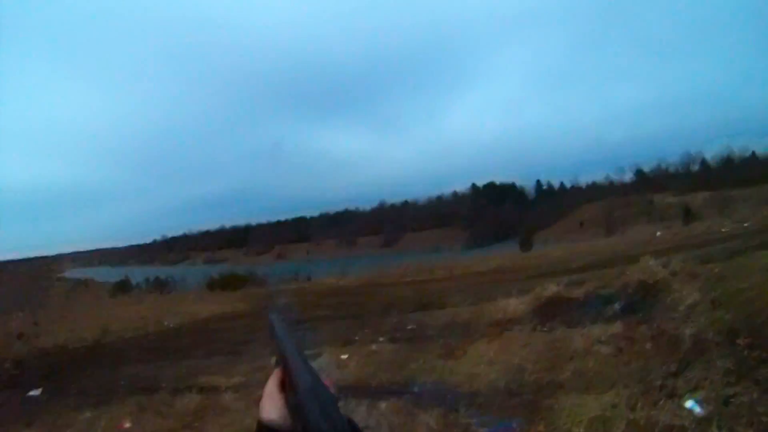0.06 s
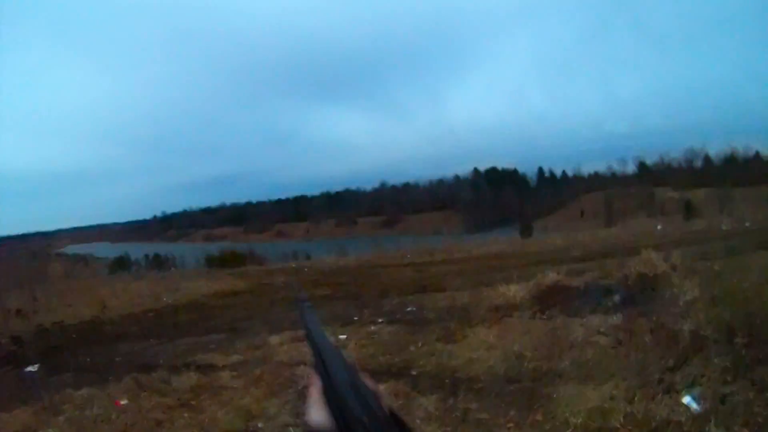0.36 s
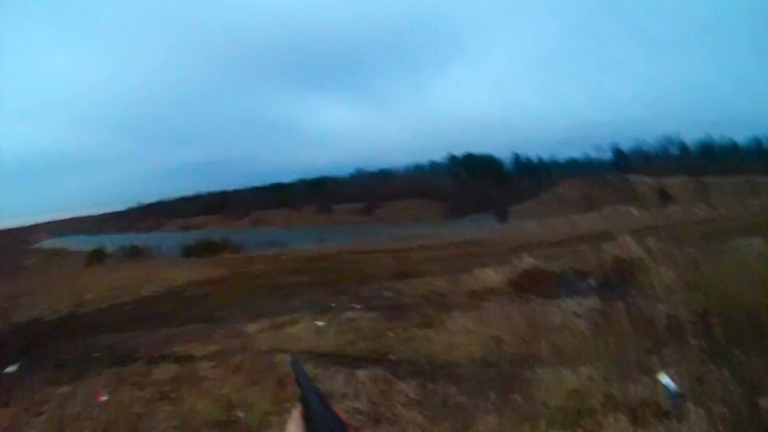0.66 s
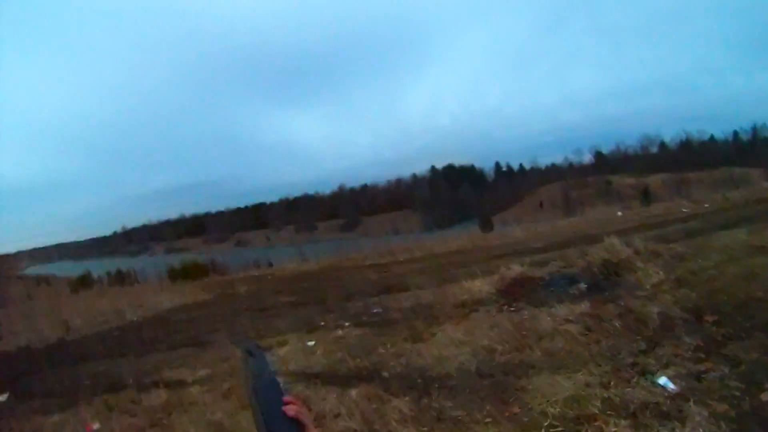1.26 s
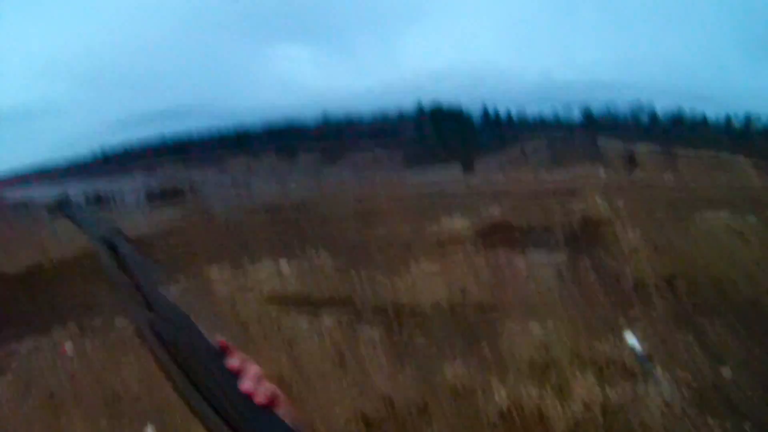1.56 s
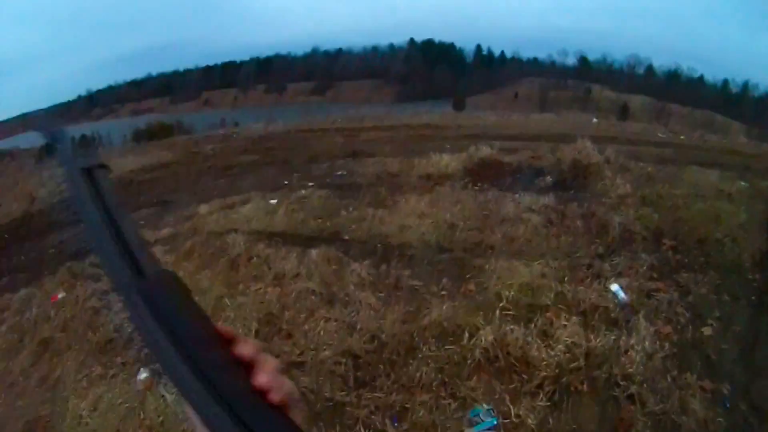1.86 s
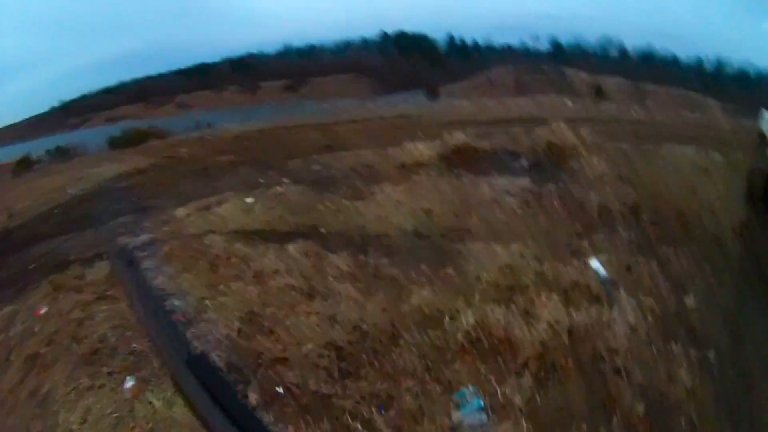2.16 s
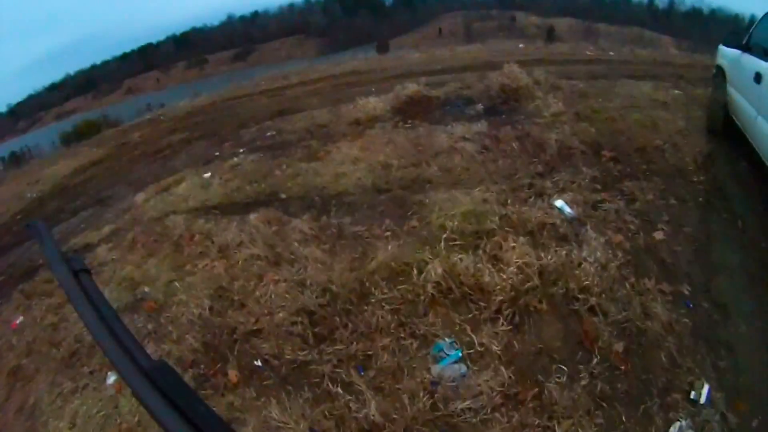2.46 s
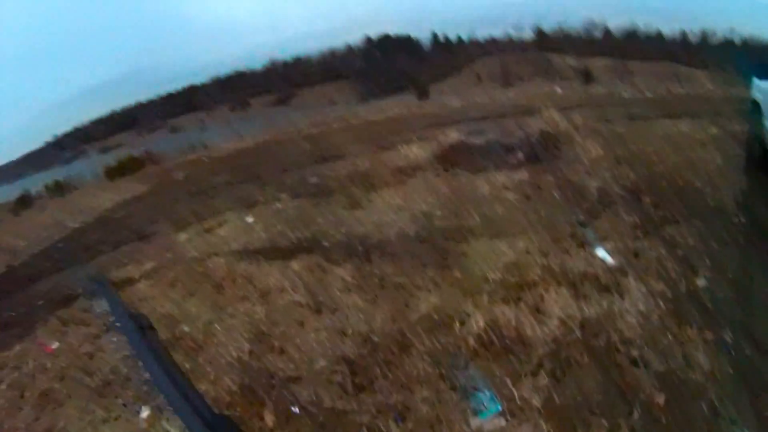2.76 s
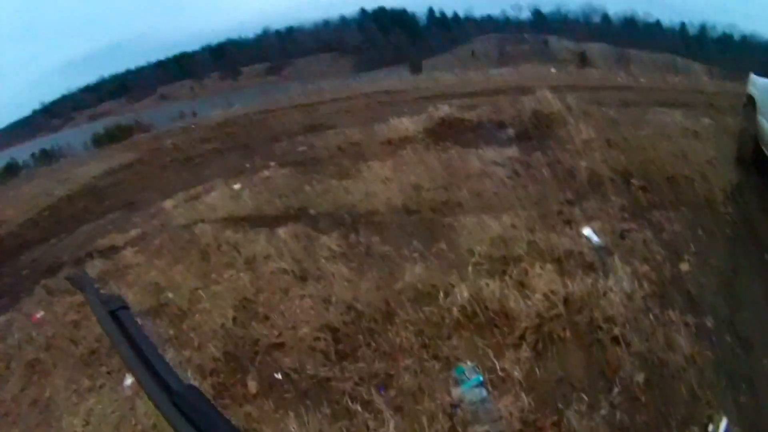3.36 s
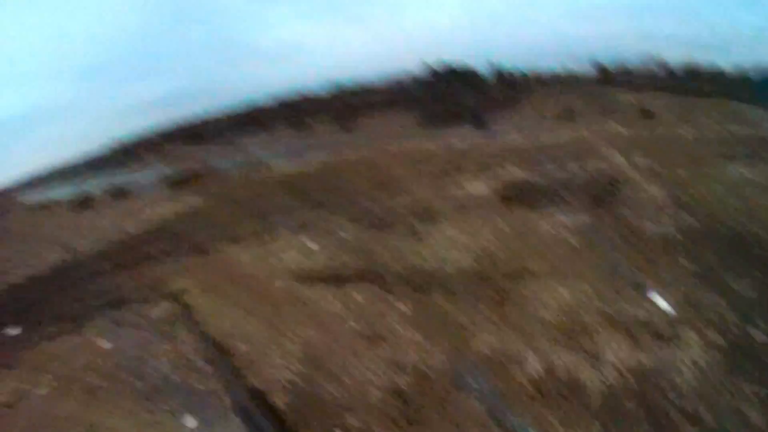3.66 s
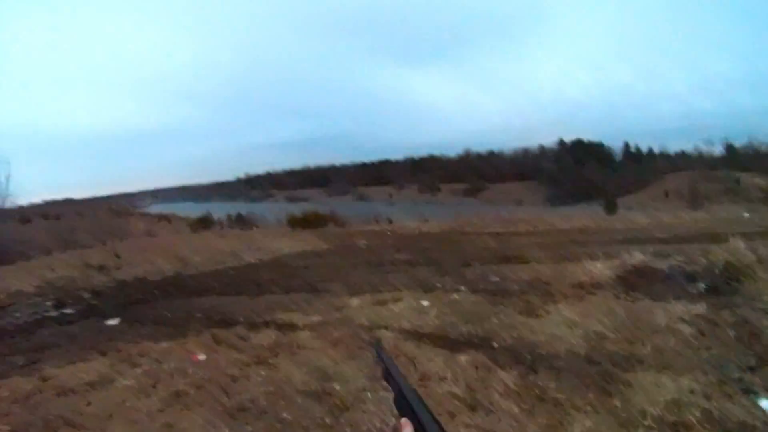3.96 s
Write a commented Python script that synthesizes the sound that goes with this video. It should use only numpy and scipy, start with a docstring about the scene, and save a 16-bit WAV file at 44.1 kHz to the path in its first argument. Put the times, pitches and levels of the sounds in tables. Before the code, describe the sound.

Close steel clicks and clacks of a shotgun being worked, over a dying gunshot echo outdoors.

```python
"""An open field: a shotgun is worked right beside a body-worn microphone. Steel parts slide, latch and
clack, ringing the receiver and barrel, and the stock knocks with them. The echo of a shot fired just
before rolls back from nearby banks and a far wooded slope, duller as it dies. Under it lie quiet field
air, a faint regular ticking and a trace of electrical whine. The gain ducks after the loudest clacks."""
import sys
import numpy as np
from scipy import signal
from scipy.fft import rfft, irfft, next_fast_len
from scipy.io import wavfile
from scipy.ndimage import uniform_filter1d

SR = 44100
rng = np.random.default_rng(int(sys.argv[2]) if len(sys.argv) > 2 else 0)


def file_out(sig):
    """Save sig as 16-bit WAV at sys.argv[1]."""
    # one column per channel
    cols = np.atleast_2d(sig).T
    # limit, then scale
    lim = np.clip(cols, -1, 1)
    pcm = np.round(lim * 32767).astype(np.int16)
    wavfile.write(sys.argv[1], SR, pcm)


N = 176400
HIT_TIME_S = np.arange(N // 16) / SR

# Steel contact: freq_hz, density_db
STEEL_SPECTRUM = [(1000, -25), (1600, -17), (2200, -4), (3000, -7), (3700, 1), (4800, -4), (6500, -2),
                  (8700, -14.5), (10300, -10), (11500, -13.5), (13500, -19.5), (16000, -32.5)]
# Stock knock: freq_hz, density_db
STOCK_SPECTRUM = [(40, -36.5), (150, -21.5), (330, -7), (520, -4.5), (650, 0), (780, -4), (1000, -5),
                  (1400, -12), (2500, -34), (6000, -58.5)]
# Receiver and barrel: pitch_hz, level_db, t60_s
STEEL_MODES = [(861.5, -23, 0.14), (2150, -6.5, 0.036), (2280, -1.5, .028), (2470, -6, 0.018),
               (2630, -3, .024), (3480, -2, 0.036), (3680, -0.5, 0.028), (4021, -4.5, 0.029),
               (4290, -5, 0.012), (4550, 0, 0.023), (4823, -0.5, 0.032), (5100, -4.5, 0.045),
               (6260, -4, 0.029), (6350, -5, .022), (10300, -7, 0.0069)]
# Strikes: start_s, steel_db, stock_db, contact_t60_s, tilt_db_per_octave
CLACKS = [(0.0045, -2, -15, 0.012, 2), (0.0118, -15.5, -29, 0.016, -1), (0.0165, -18.5, -32.5, 0.035, -1.5),
          (0.1157, -34, -40, 0.036, -5), (0.1256, -31.5, -46, 0.03, -7), (0.1318, -19.5, -31, 0.012, 1),
          (0.1401, -33, -25.5, 0.037, -2.5), (0.1446, -29, -40, 0.021, -9.5),
          (0.4262, -19.5, -34.5, 0.012, -3), (0.4433, -6, -24, 0.015, -0.5), (0.574, -46, -60, 0.024, 3),
          (0.6314, -33.5, -44.5, 0.036, -5.5), (0.6444, -29.5, -39, 0.023, -5.5),
          (0.6506, -18.5, -32.5, 0.024, -2), (0.6591, -28.5, -22, 0.019, -5), (0.6616, -30, -58, 0.03, -2),
          (0.679, -30.5, -40, 0.017, -6), (2.0048, -32, -34.5, 0.039, -6.5), (2.305, -45, -69, 0.016, -6.5),
          (2.971, -10, -25.5, 0.0045, -1), (2.98, -12.5, -32, 0.015, 0.5), (3.7075, -27, -47.5, .012, 3),
          (3.7152, -28.5, -34, 0.022, -1.5), (3.721, -30, -34, 0.034, 4), (3.7325, -19.5, -27, 0.019, 2.5),
          (3.7405, -26.5, -29, 0.0092, 0.5), (3.7523, -10, -23, 0.018, -3),
          (3.7618, -15.5, -22.5, 0.0141, 3.5), (3.7686, -6, -25, 0.021, -1.5), (3.7743, 0, -25.5, 0.011, 4),
          (3.7765, -2, -23, .011, -3), (3.7805, -20.5, -29, 0.0084, -7)]
KNOCK_T60_S = 0.026


def clacks(chatter_s=0.0016, ring_db=-5.5, full_contact_s=0.025):
    """Steel parts strike and chatter, knocking the stock; longer contacts ring the barrel harder."""
    out = np.zeros(N)
    for start_s, steel_db, stock_db, t60_s, tilt in CLACKS:
        drive = t60_s / full_contact_s
        contact = burst(STEEL_SPECTRUM, t60_s, tilt, hold_s=chatter_s * min(2 * drive, 1))
        steel = contact + undb(ring_db) * drive * ring(STEEL_MODES)
        knock = burst(STOCK_SPECTRUM, KNOCK_T60_S)
        add(out, start_s, undb(steel_db) * steel + undb(stock_db) * knock)
    return out


# Stock in the hands: pitch_hz, level_db, t60_s
STOCK_MODES = [(233, -7.5, 0.039), (360, -6.5, 0.026), (490, -5.5, 0.015), (660, 1.5, 0.028),
               (924, -3.5, 0.0088), (1440, -6.5, .008), (2037, -2, 0.021), (2940, -4.5, .006)]
# Heavy contacts: start_s, level_db
THUDS = [(0.0055, -19.5), (0.142, -60), (0.4437, -28), (0.6595, -29), (2.9715, -15)]


def thuds(click_db=11, click_decay_s=0.00006):
    """A heavy contact starts with one sharp pulse and thuds through the stock and hands."""
    out = np.zeros(N)
    click = undb(click_db) * np.exp(-HIT_TIME_S / click_decay_s)
    for start_s, level_db in THUDS:
        add(out, start_s, undb(level_db) * (ring(STOCK_MODES) + click))
    return out


# Latch ring: pitch_hz, level_db, t60_s
LATCH_MODES = [(3006, -3.5, 0.0091), (3470, 4, 0.018), (3740, -5, 0.014), (5080, -6.5, 0.012),
               (6140, -7, 0.014), (7730, -4, 0.0067), (10700, -12, 0.0093)]
# Snaps: start_s, level_db
LATCH_SNAPS = [(2.0063, -27), (2.98, -11), (3.6842, -34), (3.6997, -12), (3.736, -12)]


def latch(crack_db=-16, knock_db=-17.5):
    """A sprung latch snaps: a ping, a steel crack and a light knock in the stock."""
    out = np.zeros(N)
    for start_s, level_db in LATCH_SNAPS:
        ping = ring(LATCH_MODES)
        crack = undb(crack_db) * burst(STEEL_SPECTRUM, t60_s=0.014)
        knock = undb(knock_db) * burst(STOCK_SPECTRUM, KNOCK_T60_S)
        add(out, start_s, undb(level_db) * (ping + crack + knock))
    return out


# Hollow fore-end: freq_hz, density_db
FORE_END_SPECTRUM = [(60, -38.5), (250, -18), (500, -8.5), (620, -9.5), (745, 5), (850, 2.5), (1050, -7.5),
                     (1400, -16), (2000, -7.5), (2600, -28.5), (6000, -62.5)]
# Strokes: start_s, length_s, steel_db, fore_end_db, tilt_db_per_octave
SLIDES = [(0.411, 0.016, -41, -52.5, -10), (1.995, 0.0097, -45.5, -67, -6.5), (2.029, 0.07, -63, -66, -0.5),
          (2.913, 0.035, -60, -72, -8), (2.943, 0.037, -37.5, -54, -4.5), (3.688, 0.032, -40, -46, 0.5),
          (3.716, 0.035, -29, -33, -1), (3.744, 0.021, -23, -26, 2)]


def slides(ramp_s=0.0043):
    """Steel scrapes on steel in tiny impulses that also sound the hollow fore-end."""
    out = np.zeros(N)
    for start_s, length_s, steel_db, fore_end_db, tilt in SLIDES:
        contact = np.clip(np.minimum(HIT_TIME_S, length_s - HIT_TIME_S) / ramp_s, 0, 1)
        scrape = contact * grains(len(HIT_TIME_S), per_s=4400, spread=0.39)
        steel = undb(steel_db) * colour(scrape, STEEL_SPECTRUM, tilt)
        fore_end = undb(fore_end_db) * colour(scrape, FORE_END_SPECTRUM)
        add(out, start_s, steel + fore_end)
    return out


def scatter(sound, level_db=-23, t60_s=0.11):
    """Grass and clothing throw back a short diffuse tail."""
    response = rng.standard_normal(len(HIT_TIME_S)) * fade(t60_s)
    return undb(level_db) * signal.fftconvolve(sound, response / np.linalg.norm(response))[:N]


# Far slope and near banks: freq_hz, density_db
FAR_SPECTRUM = [(60, -26.5), (130, -11.5), (230, -1.5), (450, 1.5), (700, -1), (1000, -11.5), (1500, -21),
                (2400, -22.5), (3100, -29.5), (3600, -37.5), (6000, -55)]
NEAR_SPECTRUM = [(200, -13), (600, -6.5), (900, 4.5), (1300, -11.5), (2000, -14), (2900, -12.5),
                 (3800, -28), (5200, -28.5), (8000, -47.5)]
# Echo envelopes: time_s, level_db
FAR_ENVELOPE = [(0, -64.5), (.42, -60.5), (.57, -46), (.69, -44), (.735, -37.5), (.755, -48), (.775, -38.5),
                (.93, -38), (1.0, -36.5), (1.08, -39.5), (1.45, -42), (1.56, -47.5), (1.74, -41.5),
                (1.98, -46.5), (2.22, -46), (2.6, -53), (3.1, -59.5), (4, -68.5)]
NEAR_ENVELOPE = [(0, -39.5), (.15, -64), (.255, -58), (.27, -52), (.38, -53.5), (.5, -48.5), (.8, -48),
                 (1.3, -68), (4, -95)]
# Distinct reflections: start_s, level_db
SLAPS = [(0.195, -42), (0.223, -43.5), (0.267, -43), (0.299, -44), (0.7, -29.5), (.767, -28), (0.903, -32),
         (.998, -29.5), (1.125, -31), (1.441, -32.5), (1.483, -33.5), (1.572, -33.5)]


def shot_echo(grains_per_s=2600, spread=0.64, flutter_db=0.8, far_arrival_s=0.5):
    """Banks and trees return the shot as countless small reflections and a few distinct slaps."""
    far = air_absorption(colour(grains(N, grains_per_s, spread), FAR_SPECTRUM))
    out = far * curve(FAR_ENVELOPE) * undb(flutter_db * wander(rate_hz=45))
    for start_s, level_db in SLAPS:
        spectrum = FAR_SPECTRUM if start_s > far_arrival_s else NEAR_SPECTRUM
        add(out, start_s, undb(level_db) * burst(spectrum, t60_s=0.02))
    near = colour(grains(N, grains_per_s, spread), NEAR_SPECTRUM)
    return out + near * curve(NEAR_ENVELOPE)


def air_absorption(echo, db_per_khz_s=3.5, onset_s=1):
    """Later reflections have crossed more air and lost more treble."""
    freq_hz, time_s, frames = signal.stft(echo, SR, nperseg=512)
    loss_db = db_per_khz_s * np.outer(freq_hz / 1000, np.maximum(time_s - onset_s, 0))
    return signal.istft(frames * undb(-loss_db), SR)[1][:N]


# Field air: freq_hz, density_db
AIR_SPECTRUM = [(25, -0.5), (90, 0), (200, -4), (400, -14.5), (800, -13), (1600, -19.5), (5000, -25),
                (9000, -30), (13500, -32), (15000, -45.5)]


def field_air(level_db=-58.5, waver_db=1.93):
    """Quiet air: low rumble and hiss, slowly wavering."""
    noise = colour(rng.standard_normal(N), AIR_SPECTRUM)
    return noise * undb(level_db + waver_db * wander(rate_hz=2.3))


# Tick: freq_hz, density_db
TICK_SPECTRUM = [(60, -4.5), (200, 2), (600, -7), (1400, -18.5), (3000, -28), (12000, -32), (16000, -61.5)]


def ticking(first_s=0.067, period_s=0.1025, level_db=-41.5):
    """Faint dull ticks, about ten a second."""
    out = np.zeros(N)
    for start_s in np.arange(first_s, N / SR, period_s):
        add(out, start_s, undb(level_db) * burst(TICK_SPECTRUM, t60_s=0.012))
    return out


def whine(start_s=3.913, length_s=0.078, pitch_hz=3315, jitter=0.003, level_db=-71.5):
    """Brief electrical interference: four harmonics on an unsteady pitch."""
    elapsed_s = np.arange(N) / SR - start_s
    gate = (elapsed_s > 0) & (elapsed_s < length_s)
    phase = 2 * np.pi * np.cumsum(pitch_hz * (1 + jitter * wander(rate_hz=200))) / SR
    buzz = sum(np.sin(k * phase) / np.sqrt(k) for k in range(1, 5))
    return undb(level_db) * gate * buzz


def burst(spectrum, t60_s, tilt_db_per_octave=0, hold_s=0):
    """Fast-dying coloured noise; t60_s alone sets its energy."""
    noise = rng.standard_normal(len(HIT_TIME_S)) * fade(t60_s, hold_s)
    rms = np.sqrt(np.mean(fade(t60_s) ** 2))
    return rms * unit_rms(colour(noise, spectrum, tilt_db_per_octave))


def ring(modes, spread_db=4):
    """Decaying modes, struck a little differently each time."""
    pitch_hz, level_db, t60_s = np.array(modes).T
    gains = unit_rms(undb(level_db + spread_db * rng.standard_normal(len(modes))))
    gains *= np.sqrt(2 / len(modes))
    return sum(gain * fade(decay_s) * np.sin(2 * np.pi * (hz * HIT_TIME_S + rng.random()))
               for hz, gain, decay_s in zip(pitch_hz, gains, t60_s))


def grains(samples, per_s, spread):
    """Random impulses of log-normal size and either sign."""
    sizes = np.exp(spread * np.clip(rng.standard_normal(samples), -2, 2))
    signs = np.sign(rng.standard_normal(samples))
    present = rng.random(samples) < per_s / SR
    return unit_rms(sizes * signs * present + 1e-9)


def colour(x, spectrum, tilt_db_per_octave=0):
    """Causal filter with the given spectrum; keeps the power of white noise."""
    size = next_fast_len(len(x) // 2 + 1024) * 2
    octave = np.log2(np.maximum(np.arange(size // 2 + 1) * SR / size, 1))
    freq_hz, density_db = np.array(spectrum).T
    tilt_db = tilt_db_per_octave * np.maximum(octave, np.log2(freq_hz[0]))
    gain = unit_rms(undb(np.interp(octave, np.log2(freq_hz), density_db) + tilt_db))
    # Folded cepstrum gives minimum phase.
    cepstrum = irfft(np.log(gain))
    cepstrum[1:size // 2] *= 2
    cepstrum[size // 2 + 1:] = 0
    return irfft(rfft(x, size) * np.exp(rfft(cepstrum)))[:len(x)]


def fade(t60_s, hold_s=0, attack_s=0.00046):
    """Quick rise, hold, exponential fall."""
    rise = 1 - np.exp(-HIT_TIME_S / attack_s)
    return rise * np.exp(-np.log(1000) * np.maximum(HIT_TIME_S - hold_s, 0) / t60_s)


def wander(rate_hz):
    """Smooth random drift, rms 1."""
    step = int(SR / rate_hz)
    stairs = np.repeat(rng.standard_normal(N // step + 1), step)[:N]
    return unit_rms(uniform_filter1d(stairs, step))


def curve(envelope):
    """Gain per sample from time_s, level_db points."""
    return undb(np.interp(np.arange(N) / SR, *np.array(envelope).T))


def add(out, start_s, sound):
    """Mix in place at start_s."""
    i = max(int(start_s * SR), 0)
    out[i:i + len(sound)] += sound[:max(len(out) - i, 0)]


def undb(db):
    """Decibels to gain."""
    return 10 ** (np.asarray(db) / 20)


def unit_rms(x):
    """Scale to rms 1."""
    return x / np.sqrt(np.mean(x ** 2))


def scene():
    """Close gun, distant echo and background, in mono."""
    gun = clacks() + thuds() + latch() + slides()
    return (gun + scatter(gun) + shot_echo() + field_air() + ticking() + whine())[None]


def record(dry):
    """Gain control ducks after loud sounds and recovers; peaks are capped and the top is cut."""
    knee_db, release_s, lag_s, cutoff_hz = -30.5, 0.16, 0.036, 15900
    pole = np.exp(-1 / (release_s * SR))
    power = signal.lfilter([1 - pole], [1, -pole], dry[0] ** 2)
    lagged_power = np.interp(np.arange(N) - lag_s * SR, np.arange(N), power, left=0)
    ducked = dry / np.sqrt(1 + lagged_power / undb(knee_db) ** 2)
    lowpass = signal.ellip(8, 0.2, 70, cutoff_hz, fs=SR, output="sos")
    return signal.sosfilt(lowpass, np.clip(ducked, -1, 1))


dry = scene()
out = record(dry)
file_out(out)
```